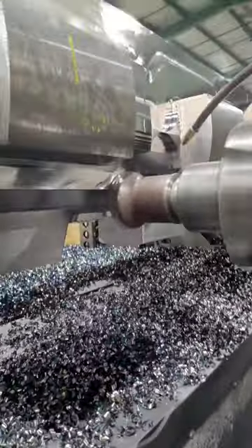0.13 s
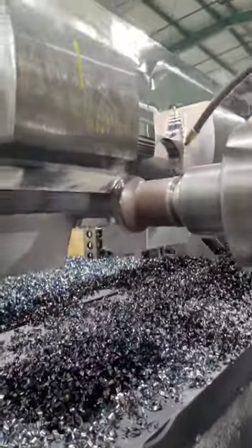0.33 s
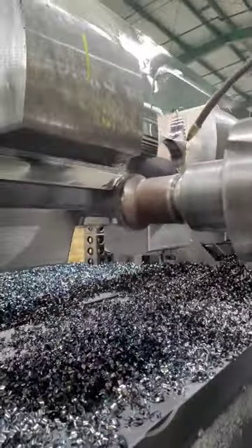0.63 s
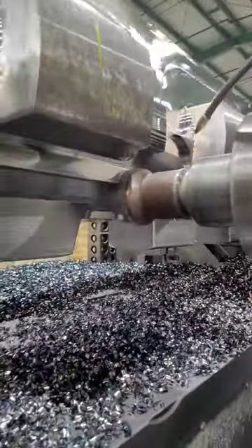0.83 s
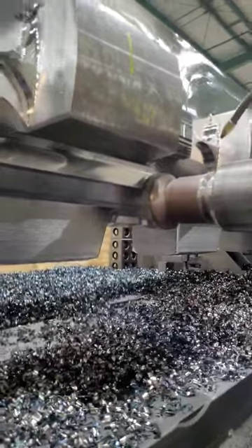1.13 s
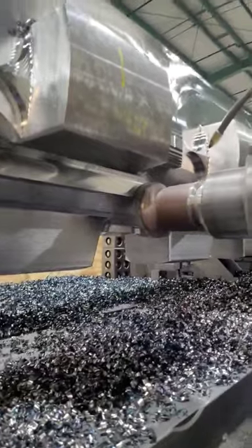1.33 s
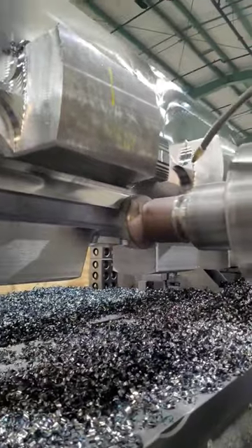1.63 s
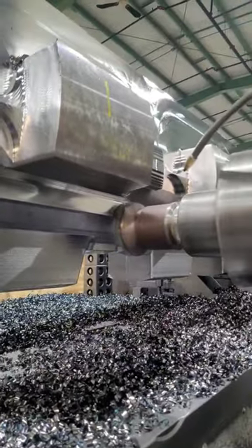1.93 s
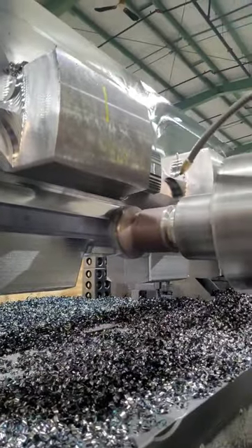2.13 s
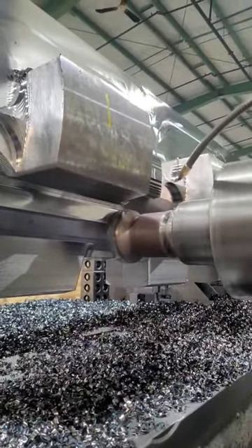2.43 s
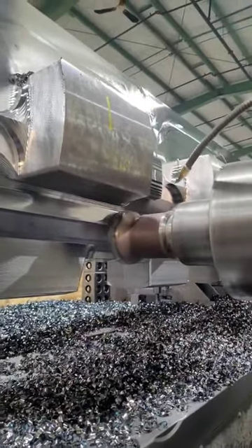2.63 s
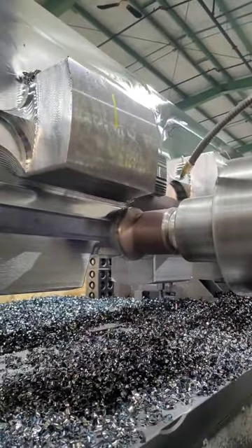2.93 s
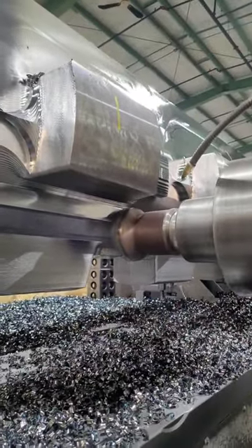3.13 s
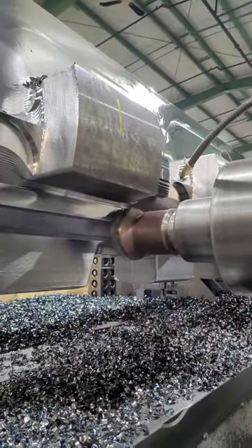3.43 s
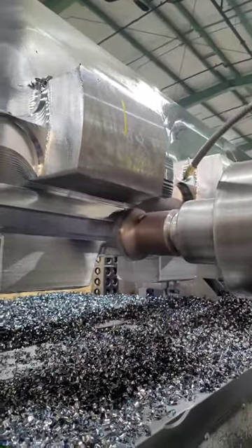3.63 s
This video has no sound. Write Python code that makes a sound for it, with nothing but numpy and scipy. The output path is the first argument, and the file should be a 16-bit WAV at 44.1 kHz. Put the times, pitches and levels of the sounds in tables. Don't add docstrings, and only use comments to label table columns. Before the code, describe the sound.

Continuous high, slightly fluttering squeal of a cutter on steel, with metallic ringing, hissing air jet, pulsing hum and distant motors in a big hall; the moving stereo microphone starts close, then draws back slightly.

```python
import sys
import numpy as np
from scipy import signal
from scipy.fft import rfft, irfft, next_fast_len
from scipy.io import wavfile
from scipy.ndimage import map_coordinates

SR = 44100
rng = np.random.default_rng(int(sys.argv[2]) if len(sys.argv) > 2 else 0)


def unload_wav(signal):
    wavfile.write(
        sys.argv[1],
        SR,
        np.round(np.clip(np.atleast_2d(signal).T, -1, 1) * 32767).astype(np.int16),
    )


def level_to_linear(level):
    exponent = np.asarray(level, float) / 20
    return 10 ** exponent


N = 166257

TURNS_PER_S = 7.576
SOUND_MM_PER_S = 343000

# start_s, nearness_db, jet_left_minus_right_db
STANCE = [
    (0, 2.5, -5),
    (.6, 2, -5),
    (1.2, 1, -16),
    (1.7, -1, -23.5),
    (2.4, -.5, -15),
    (3.1, -0.5, -12),
    (3.77, -0.5, -11),
]

# start_s, left_db, right_db, extra_path_right_mm
SQUEAL_PATH = [(0, -24, -22, -60), (.15, -16.5, -20, -19), (.35, -20, -18, -20), (.55, -23.5, -15.5, -26),
               (.8, -20, -24, -21), (.95, -25.5, -14.5, -34), (1.15, -23, -19, -22),
               (1.45, -26, -20.5, -17.5), (1.75, -28, -15.5, -15), (2.1, -28.5, -15, -24),
               (2.3, -23, -13, -25), (2.55, -22, -16.5, -54), (2.7, -22, -16.5, -48.5),
               (2.95, -21, -17, -47), (3.2, -25.5, -19.5, -61), (3.35, -25, -18.5, -68),
               (3.6, -25.5, -20.5, -61), (3.76, -30, -19.5, -48)]
# centre_hz, width_hz, left_db, right_db
SQUEAL_SKIRT = [(4526, 57, -12, -13.5)]
# multiple, left_db, right_db
SQUEAL_OVERTONES = [(2, -35, -42), (3, -41, -37)]
LOAD_THROB = [(2, .16, .42), (7, .08, .016), (1, .06, .75), (4, .18, .2), (8, .1, .3), (3, .1, .1)]
SQUEAL_HZ, SQUEAL_FLUTTER_PER_S = 4529.2, 22
SQUEAL_FLUTTER, SQUEAL_WANDER_RAD = .15, .22

# pitch_hz, level_db_per_hz
JET_COLOUR = [(1500, -6.5), (2800, -7), (3250, -14), (3700, -3.5), (7900, -1.5), (8500, -6.5),
              (11800, -0.5), (15500, 2.5)]
# pitch_hz, share
JET_AIM = [(2000, 0.16), (3100, 0.13), (4000, 0.76), (6500, 0.2), (9000, 0.021), (11500, 0.41),
           (15500, 0.59)]
# pitch_hz, likeness
JET_LIKENESS = [(1500, .45), (3500, .6), (6000, .33), (9000, .22), (15000, .15)]
# start_s, path_mm
JET_PATH = [
    (0, 62),
    (.45, 49),
    (1.0, 54),
    (1.5, 50),
    (2.0, 24),
    (2.8, 22),
    (3.77, 22),
]
JET_DB, JET_SHIFT_DB = -22, .8

# pitch_hz, width_hz, left_db, right_db
CHIP_RINGS = [(3880, 60, -55, -53), (4193, 40, -47, -46), (4837, 32, -42, -42), (4995, 45, -47, -45),
              (5265, 60, -50, -46), (5610, 150, -49, -46), (5775, 100, -49, -51), (7150, 250, -48, -48),
              (8718, 90, -54, -55), (9363, 50, -52, -53), (10110, 200, -52, -50), (13300, 400, -47, -43)]
RING_LEAN = [-0.19, 1.3, 0.15, -.6, 1.4, .8, 0.62, -2.6, -0.26, 1.2, 0.71, -.4]
RINGS_DB, RING_SWELL_DB = 5, 1.3
RING_PATH_MM, RING_LIKENESS = 115, .4

# order_of_turn, level_db, left_minus_right_db
FRAME_ORDERS = [(7, -40, -4), (12, -51, 1), (13, -42, 1), (14, -46, -2), (16, -49, -1), (18, -46, -2),
                (19, -44, -2), (20, -46, 1), (21, -39, 0), (22, -49, -1), (25, -49, -5), (26, -44, 2),
                (27, -41, -4), (28, -37, -5), (29, -45, -3), (30, -49, -3), (32, -47, -2), (33, -39, -1),
                (34, -50, 0), (36, -51, 2), (37, -43, -2), (40, -44, -4), (42, -37, -2), (43, -50, -1),
                (44, -44, -4), (49, -48, 7), (51, -49, 2), (56, -40, -1), (63, -44, 0), (66, -49, 3),
                (15, -55, 1), (17, -54, 0), (23, -53, -2), (24, -50, -1), (35, -54, -4), (38, -53, 4),
                (39, -54, -5), (47, -54, -4), (55, -52, -1), (64, -54, 1), (70, -54, -11), (77, -53, -11)]
# pitch_hz, share_of_turn
FRAME_SWELL = [(60, .434), (100, .421), (150, .954), (205, .57), (225, 1.281), (260, .373), (320, .531),
               (430, .55)]
FRAME_DB, FRAME_WAVER_DB, FRAME_SCATTER_RAD = 0.0, .8, .15

TOOTH_BITE = [-5, -9, -3, 0.0, -2, -5, -4]
# pitch_hz, left_db, right_db, t60_s
HEAD_MODES = [(637, -59, -47, .25), (690, -54, -50, .25), (742, -52, -49, .25), (795, -50, -55, .25),
              (848, -53, -48, .25), (901, -52, -49, .22), (955, -56, -38, .22), (1010, -45, -36, .14),
              (1066, -30, -41, .1), (1122, -31, -30, .06), (1172, -30, -28, .06), (1226, -34, -32, .055),
              (1275, -38, -36, .05), (1335, -42, -39, .05)]
FIRST_TOOTH, HEAD_DB = .016, -.5
EVEN_HZ, UNEVEN_POWER = 860, 4
TOOTH_SCATTER_DB, SPREAD_S = 1.0, .005

# pitch_hz, level_db_per_hz
RUMBLE_COLOUR = [(25, -21), (38, -16), (120, -6), (300, -8.5), (600, -14.5), (1050, -8), (1400, -18.5),
                 (3300, -21)]
# pitch_hz, likeness
HALL_LIKENESS = [(60, 0.66), (130, 0.97), (290, 0.73), (640, 0.66), (1200, -0.42), (3000, 0.31)]
RUMBLE_DB, RUMBLE_PAN_DB = -31, -4

# centre_hz, width_hz, left_db, right_db
PLANT = [(71, 3, -46, -45), (108, 3, -49, -48), (255, 12, -46, -44), (542, 40, -44, -43),
         (965, 90, -51, -46), (1501, 6, -55, -50), (1964, 10, -55, -52), (2000, 70, -47, -43)]
PLANT_SWELL_DB = 1.2

LOW_FOLLOWS, HIGH_FOLLOWS = 0.59, 0.9


def in_time(rows):
    s, *columns = np.transpose(rows)
    return [np.interp(np.arange(N) / SR, s, c) for c in columns]


def at_hz(points, hz):
    point_hz, value = np.array(points).T
    return np.interp(np.log(hz + 1), np.log(point_hz), value)


def rms_one(x):
    return x / np.sqrt(np.mean(x ** 2) + 1e-20)


def drift(rate, count=1):
    r = np.exp(-80 * np.pi * rate / SR)
    noise = rng.standard_normal((count, N // 40 + 2002))
    slow = signal.lfilter([1], [1, -2 * r, r * r], noise)[:, 2000:]
    return np.array([np.interp(np.arange(N) / 40, np.arange(len(v)), rms_one(v)) for v in slow])


def resonate(x, hz, width_hz):
    r = np.exp(-np.pi * width_hz / SR)
    poles = [1, -2 * r * np.cos(2 * np.pi * hz / SR), r * r]
    return signal.lfilter([(1 - r * r) / 2, 0, (r * r - 1) / 2], poles, x)


def coloured(gain):
    size = next_fast_len(N)
    spectrum = rfft(rng.standard_normal((2, size))) * gain(np.fft.rfftfreq(size, 1 / SR))
    return rms_one(irfft(spectrum, size)[:, :N])


def blend(a, b, like):
    like = np.clip(like, -1, 1)
    return np.sqrt(1 + like) * a + np.sqrt(1 - like) * b * [[1], [-1]]


def narrow(rows, swell_db, alike, lean_db=None):
    out, lead = 0, SR // 2
    for k, (hz, width_hz, left_db, right_db) in enumerate(rows):
        mid, side = rng.standard_normal((2, N + lead))
        rung = blend(mid, side, alike(hz))
        for _ in range(2):
            rung = resonate(rung, hz, 1.48 * width_hz)
        rung = rms_one(rung[:, lead:])
        lean = 0 if lean_db is None else lean_db[k]
        out = out + level_to_linear([[left_db], [right_db]]) * level_to_linear(swell_db * drift(0.87) + lean) * rung
    return out


def later_right(pair, path_mm):
    at = np.arange(N) - path_mm / SOUND_MM_PER_S * SR
    return np.array([pair[0], map_coordinates(pair[1], [at], order=5, mode="mirror")])


def turn():
    return np.arange(N) / SR * TURNS_PER_S


def throb():
    return 1 + sum(depth * np.cos(2 * np.pi * times * (turn() - peak)) for times, depth, peak in LOAD_THROB)


def squeal():
    left_db, right_db, path_mm = in_time(SQUEAL_PATH)
    level = level_to_linear(np.array([left_db, right_db])) * throb()
    phase = 2 * np.pi * SQUEAL_HZ * np.arange(N) / SR
    phase = phase + SQUEAL_WANDER_RAD * drift(SQUEAL_FLUTTER_PER_S)
    lead = 2 * np.pi * SQUEAL_HZ * np.array([path_mm, -path_mm]) / (2 * SOUND_MM_PER_S)
    out = level * narrow(SQUEAL_SKIRT, 0, lambda hz: .3)
    partials = [(1, level)] + [(m, level_to_linear([[left], [right]])) for m, left, right in SQUEAL_OVERTONES]
    for multiple, gain in partials:
        shake = drift(SQUEAL_FLUTTER_PER_S, count=4) * SQUEAL_FLUTTER
        fade = level_to_linear(1.2 * drift(.7, count=2) * (multiple > 1))
        flutter = 1 + shake[:2] + 1j * shake[2:]
        out = out + gain * fade * (flutter * np.exp(1j * (multiple * phase + lead))).real
    return out


def jet(facing_db):
    hiss = coloured(lambda hz: level_to_linear(at_hz(JET_COLOUR, hz)) * np.minimum(hz / 1500, 1) ** 3)
    size = next_fast_len(N)
    hz, spec = np.fft.rfftfreq(size, 1 / SR), rfft(hiss, size)
    like = at_hz(JET_LIKENESS, hz)
    spec[1] = like * spec[0] + np.sqrt(1 - like ** 2) * spec[1]
    edges, out = 700 * 2 ** np.arange(0, 4.75, .2), 0
    for low, high in zip(edges, edges[1:]):
        pan_db = at_hz(JET_AIM, np.sqrt(low * high)) * facing_db * np.array([[.65], [-.35]])
        waver_db = 0.1 * drift(17, count=2) + JET_SHIFT_DB * drift(0.45)
        band = irfft(spec * (hz >= low) * (hz < high), size)[:, :N]
        out = out + level_to_linear(pan_db + waver_db) * band
    return level_to_linear(JET_DB) * later_right(out, in_time(JET_PATH)[0])


def chip_rings(near_db):
    rings = narrow(CHIP_RINGS, RING_SWELL_DB, lambda hz: RING_LIKENESS, np.outer(RING_LEAN, near_db))
    return later_right(rings, RING_PATH_MM) * throb() * level_to_linear(RINGS_DB)


def frame():
    out, waver = np.zeros((2, N)), drift(0.3, count=6)
    scatter = rng.standard_normal((len(FRAME_ORDERS), 2))
    lag = np.cumsum(at_hz(FRAME_SWELL, TURNS_PER_S * (np.arange(80) - .5).clip(0)))
    for k, (order, db, pan_db) in enumerate(FRAME_ORDERS):
        apart = .005 * order * scatter[k, 1] * np.array([[1], [-1]])
        phase = 2 * np.pi * (order * turn() - lag[int(order)]) + FRAME_SCATTER_RAD * scatter[k, 0]
        tone = np.sqrt(2) * np.cos(phase + apart)
        level = level_to_linear(db + FRAME_DB + FRAME_WAVER_DB * waver[k % 6])
        out += level * level_to_linear([[pan_db / 2], [-pan_db / 2]]) * tone
    return out


def teeth():
    lead = SR // 4
    bite = np.arange(-12, int(N / SR * TURNS_PER_S * 7) - 1)
    at = np.round((FIRST_TOOTH + bite / 7) / TURNS_PER_S * SR).astype(int) + lead
    out = np.zeros((2, N + lead))
    for hz, left_db, right_db, t60 in HEAD_MODES:
        bite_db = np.array(TOOTH_BITE)[bite % 7] * (hz / EVEN_HZ) ** UNEVEN_POWER
        bite_db = bite_db + TOOTH_SCATTER_DB * rng.standard_normal(len(bite))
        clicks = np.zeros(N + lead)
        clicks[at + int(rng.random() * SPREAD_S * SR)] = level_to_linear(bite_db)
        r, w = level_to_linear(-60 / (t60 * SR)), 2 * np.pi * hz / SR
        knock = signal.lfilter([0, np.sin(w)], [1, -2 * r * np.cos(w), r * r], clicks + 1e-18)
        out += level_to_linear(HEAD_DB) * level_to_linear([[left_db], [right_db]]) * knock
    return out[:, lead:]


def rumble():
    noise = coloured(lambda hz: level_to_linear(at_hz(RUMBLE_COLOUR, hz) - 7.3 * np.maximum(hz / 3300 - 1, 0)))
    size = next_fast_len(N)
    like = at_hz(HALL_LIKENESS, np.fft.rfftfreq(size, 1 / SR))
    a, b = rfft(noise, size)
    pair = irfft(blend(a, b, like), size)[:, :N]
    return level_to_linear(RUMBLE_DB) * rms_one(pair) * level_to_linear([[RUMBLE_PAN_DB / 2], [-RUMBLE_PAN_DB / 2]])


def plant():
    return narrow(PLANT, PLANT_SWELL_DB, lambda hz: at_hz(HALL_LIKENESS, hz))


def scene():
    near_db, facing_db = in_time(STANCE)
    high = jet(facing_db) + chip_rings(near_db)
    low = frame() + teeth() + rumble() + plant()
    return squeal() + high * level_to_linear(HIGH_FOLLOWS * near_db) + low * level_to_linear(LOW_FOLLOWS * near_db)


def low_pass(x):
    return signal.sosfilt(signal.butter(12, 15490, fs=SR, output="sos"), x)


def record(dry):
    return low_pass(dry)


dry = scene()
out = record(dry)
unload_wav(out)
```